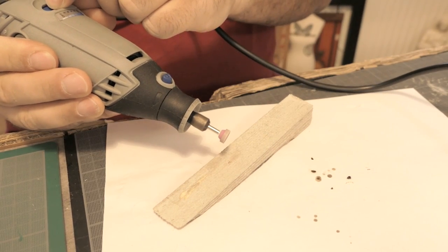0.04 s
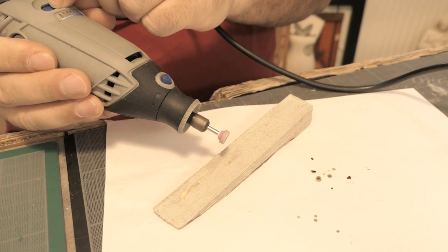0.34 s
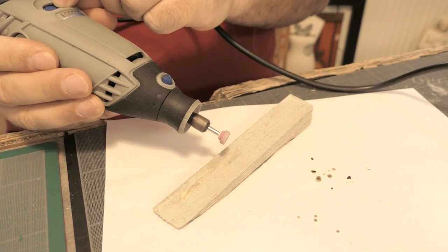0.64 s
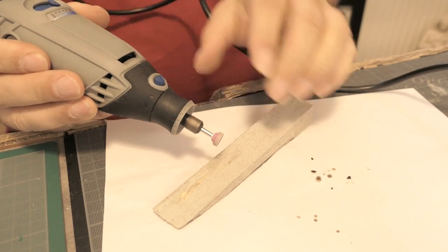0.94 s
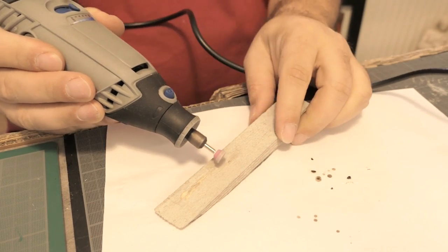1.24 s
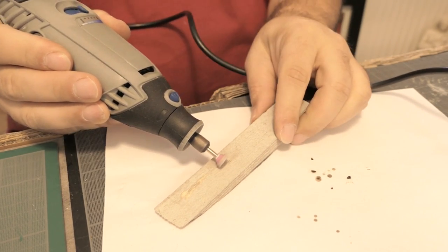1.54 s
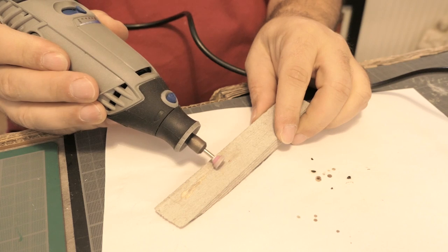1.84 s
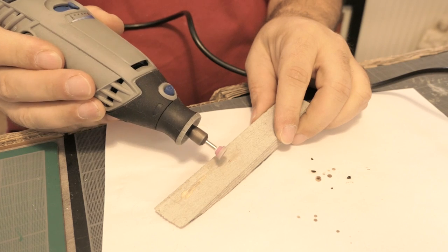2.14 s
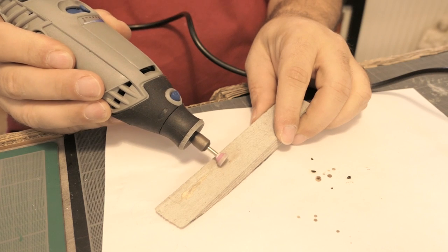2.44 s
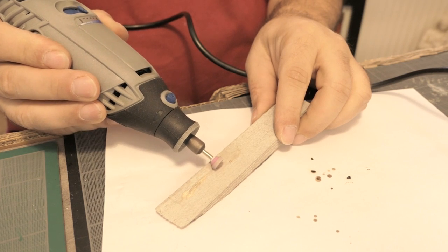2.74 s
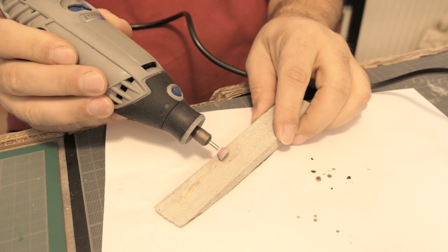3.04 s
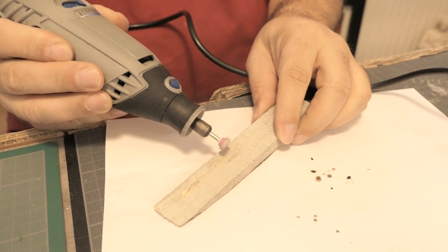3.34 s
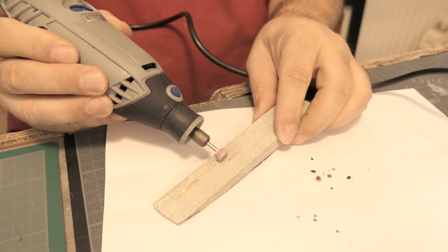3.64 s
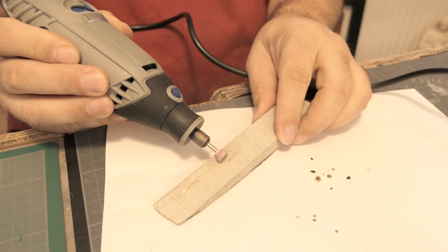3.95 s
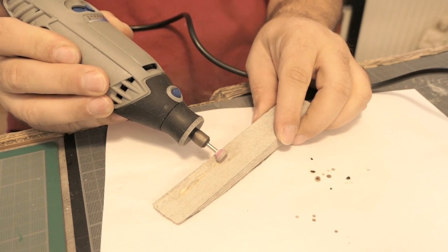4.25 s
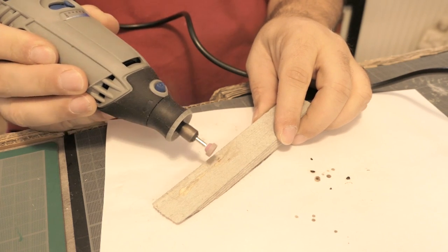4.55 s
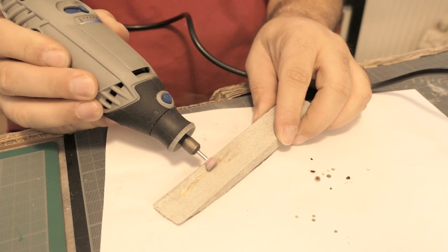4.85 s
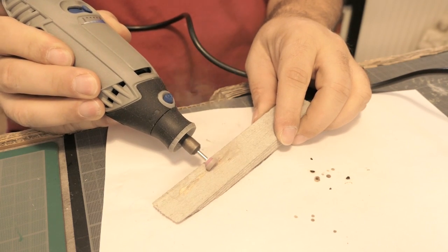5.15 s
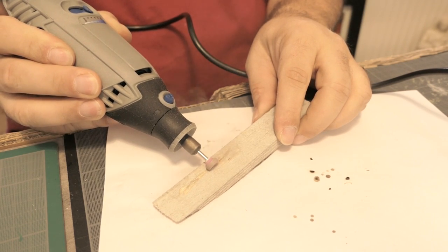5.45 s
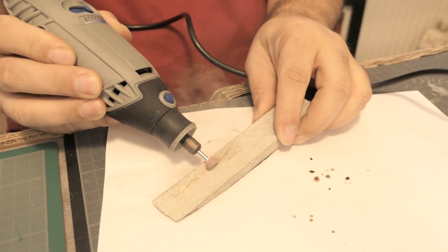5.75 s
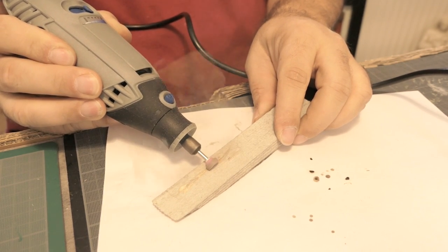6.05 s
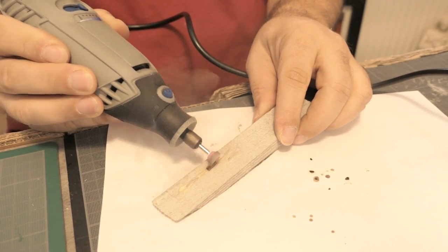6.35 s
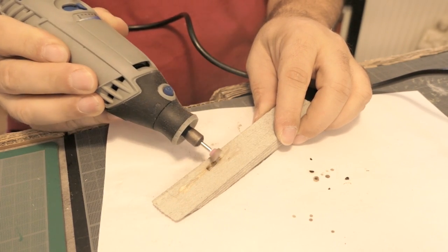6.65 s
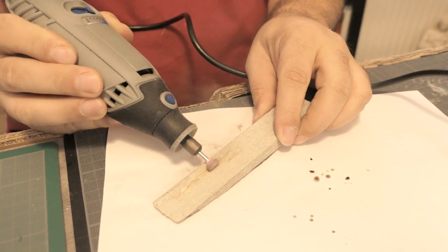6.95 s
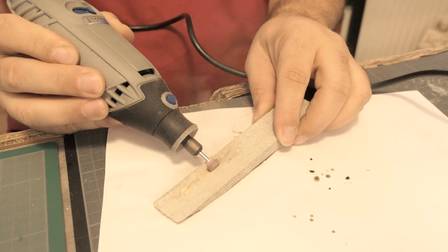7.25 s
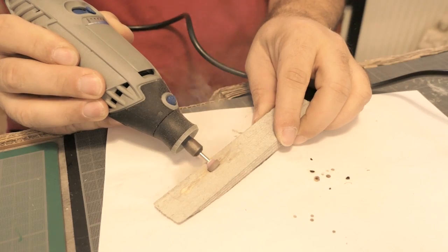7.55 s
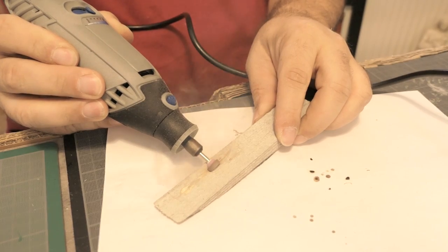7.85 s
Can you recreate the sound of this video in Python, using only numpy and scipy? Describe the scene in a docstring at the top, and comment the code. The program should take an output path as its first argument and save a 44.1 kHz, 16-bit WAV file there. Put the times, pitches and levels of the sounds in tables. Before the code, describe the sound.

Close to the microphone in a small workshop, an electric rotary tool speeds up with a buzzy whine and airy hiss. After a moment its stone scrapes lightly on wood, then digs in harder over six passes, rasping and droning as the motor slows and climbing in pitch whenever it lifts. Tiny chatters and squeaks mark the catches. The last two passes are the deepest, a strained growl that continues to the end.

```python
"""A small motor whines up to speed, then growls and rasps six times as its grinding stone bites into wood.
It is a handheld rotary tool, heard close up. Its cooling fan whistles over rushing air.
Pressing slows the motor, which draws more current and buzzes in time with the mains electricity.
The stone's high spots hit the wooden strip once a turn: a thump, a woody drone and a bright rasp."""
import sys
import numpy as np
from scipy import signal
from scipy.fft import rfft, irfft, next_fast_len
from scipy.io import wavfile
from scipy.ndimage import map_coordinates

SR = 44100
rng = np.random.default_rng(int(sys.argv[2]) if len(sys.argv) > 2 else 0)


def waveform_to_disk(signal):
    """Save audio, clipped to [-1, 1], as 16-bit WAV at the path in sys.argv[1]."""
    frames = np.transpose(np.atleast_2d(signal))
    scaled = np.clip(frames, -1, 1) * 32767
    samples = np.round(scaled).astype(np.int16)
    wavfile.write(sys.argv[1], SR, samples)


N = 357641
TIME = np.arange(N) / SR
FREE_HZ, FULL_DRAG_HZ = 425, 180  # turns a second: running freely, and lost to a firm press
MAINS_HZ, FAN_BLADES, BARS = 50, 18, 8  # bars are the motor's spinning contacts

# How the stone and its stem ring. Each row: pitch in Hz, level in dB.
STONE_RING = [(2000, -54), (3600, -18), (4200, -4.5), (4600, 0), (4820, 5.5), (5050, 8.5), (5300, 9),
              (5500, 4.5), (5700, 8), (6100, -3), (6400, 5), (6800, -11), (8200, -4.5), (9300, -13.5),
              (11500, -36), (13200, -29), (15000, -28)]


def undb(db):
    """Turn decibels into a gain."""
    return 10 ** (np.asarray(db) / 20)


def unit(x):
    """Scale a sound to an average (rms) level of 1."""
    return x / np.sqrt(np.mean(x ** 2))


def curves(table):
    """Join rows that start with a time into one curve per remaining column."""
    times, *columns = np.transpose(table)
    return [np.interp(TIME, times, column) for column in columns]


def along(points, hz):
    """Look up the level in dB at a moving pitch."""
    return np.interp(hz, *np.transpose(points))


def bump(middle_s, half_s):
    """A smooth rise to 1 and back."""
    return np.exp(-((TIME - middle_s) / half_s) ** 2)


def walk(rate):
    """A random wobble of size near 1, changing about rate times a second."""
    steps = rng.standard_normal(N // 10)
    return 1.1 * map_coordinates(steps, [TIME * rate], order=2, mode="wrap")


def colour(x, points):
    """Pass x through a ringing body, given as rows of pitch in Hz and level in dB."""
    hz, db = np.transpose(points)
    size = 4096
    grid = np.maximum(np.arange(size // 2 + 1) * SR / size, 1)
    cepstrum = irfft(np.log(undb(np.interp(np.log(grid), np.log(hz), db))))
    cepstrum[1:size // 2] *= 2  # folded so the body rings only after a hit
    cepstrum[size // 2 + 1:] = 0
    return signal.fftconvolve(x, irfft(np.exp(rfft(cepstrum))))[:N]


def bend(x, delay_s):
    """In bending wood, low notes travel slower than high ones; 1 kHz arrives delay_s late."""
    size = next_fast_len(N + SR // 4)
    hz = np.arange(size // 2 + 1) * SR / size
    return irfft(rfft(x, size) * np.exp(-4j * np.pi * delay_s * np.sqrt(1000 * hz)), size)[:N]


def strikes(turn, angle, scatter_db=1.5, slip=0.002):
    """One click a turn, uneven in size and timing; angle and slip are shares of a turn."""
    turns = np.arange(1, int(turn[-1]) - 1)
    size, shift = rng.standard_normal((N // 50, 2))[:len(turns)].T
    at = np.interp(turns + angle + slip * shift, turn, np.arange(N))
    taps = at.astype(int)[:, None] + np.arange(-3, 5)
    offset = taps - at[:, None]
    clicks = undb(scatter_db * size)[:, None] * np.sinc(offset) * np.sinc(offset / 4)
    return np.bincount(np.clip(taps, 0, N - 1).ravel(), clicks.ravel(), N)


def tone(turn, multiple, waver_db):
    """A wavering tone at a multiple of the shaft's speed."""
    return np.sqrt(2) * np.sin(2 * np.pi * multiple * turn) * undb(waver_db * walk(35))


def mains(depth):
    """Power arrives in two humps per mains cycle, averaging 1."""
    hump = 8 / 3 * np.sin(2 * np.pi * MAINS_HZ * TIME) ** 4
    return 1 + np.clip(depth, 0, 1) * (hump - 1)


def bar_tone(turn, multiple, depth, swing, jitter, waver_db):
    """A motor tone: each hump of current makes it louder and shifts its wave by swing radians."""
    lag = swing * np.cos(4 * np.pi * MAINS_HZ * TIME) + jitter * walk(200)
    return unit(mains(depth)) * tone(turn + lag / (2 * np.pi * multiple), multiple, waver_db)


def workshop(x, fade_s=0.61, echo_db=-15):
    """Add a short, thin echo from the bench and walls."""
    tail = rng.standard_normal(N) * undb(-60 * TIME / fade_s) * (TIME > .003)
    tail = signal.sosfilt(signal.butter(2, 800, "high", fs=SR, output="sos"), tail[:SR // 2])
    return x + undb(echo_db) * signal.fftconvolve(x, tail / np.linalg.norm(tail))[:N]


def fan(turn, hz, drag, air_db):
    """Air rushes through the case and hisses at the vents, where the blades whistle past."""
    # The tone of the air in the case and at the vents, and the whistle's level as its pitch moves.
    # Each row: pitch in Hz, level in dB.
    case_air = [(30, -54), (130, -25), (260, -19.5), (470, -6), (620, -12.5), (800, -3.5), (1150, 3),
                (1600, 0.5), (2100, 2), (2900, -1.5), (4200, -3), (6000, -29), (10000, -19)]
    vent_air = [(100, -52), (1500, -31), (4000, -18), (5200, -8), (6100, -10.5), (6900, -1.5), (7600, -3),
                (8300, -4.5), (9200, -6), (10000, -14.5), (11000, -17.5), (12100, -25), (13400, -22),
                (15500, -34)]
    whistle_levels = [(4300, -51), (4650, -38.5), (4900, -45), (5200, -42), (5400, -41), (5700, -50),
                      (6050, -39), (6500, -36), (6900, -31.5), (7300, -26.5), (7650, -24.5)]
    rush = unit(colour(rng.standard_normal(N) * mains(depth=0.051), case_air))
    rush *= undb(-39 + 0.99 * air_db + 1.13 * walk(30))
    hiss = unit(colour(rng.standard_normal(N) * mains(depth=0.014), vent_air))
    hiss *= undb(-33 + 0.63 * air_db + 1.13 * walk(25))
    whistle_db = along(whistle_levels, FAN_BLADES * hz) + 0.5 * np.maximum(air_db, 0) + 0.77 * walk(13)
    whistle_db += 0.5 - 5.2 * np.minimum(drag / 40, 1)  # softer while pressing
    whistle = tone(turn + 0.0015 * walk(120), FAN_BLADES, waver_db=0.8) * undb(whistle_db)
    overtone = tone(turn, 2 * FAN_BLADES, waver_db=1.0) * undb(whistle_db - 42)
    return rush + hiss + whistle + overtone


def case_rattle(turn, hz, effort, surge):
    """The loose case rattles as the current peaks, and when the buzz meets its own pitch."""
    # How the loose case rings. Each row: pitch in Hz, level in dB.
    loose_case = [(1500, -29), (2150, -12), (2380, -0.5), (2540, 2.5), (2720, -5), (2950, -11), (3500, -28)]
    ring_hz, width_hz = 2520, 420
    in_tune = np.exp(-((BARS * hz - ring_hz) / width_hz) ** 2)
    shaking = bar_tone(turn, BARS, depth=0.62, swing=0.87, jitter=1.35, waver_db=1.5)
    return colour(shaking, loose_case) * (surge * undb(-31) + in_tune * undb(-35 - 18 * effort))


def motor_buzz(turn, hz, effort, surge, bare_db):
    """The spinning bars switch the current: a buzz, with whines at 4 and 6 times its pitch."""
    # How strongly the case gives off each of the three. Each row: pitch in Hz, level in dB.
    buzz_levels = [(1700, -47.5), (1890, -41), (1965, -37), (2050, -29), (2150, -32.5), (2240, -30.5),
                   (2350, -40), (2490, -34.5), (2650, -36.5), (2800, -38.5), (3000, -45.5), (3400, -61.5)]
    whine_levels = [(7700, -44), (8000, -35), (8300, -40), (8600, -42), (9150, -49), (9450, -41),
                    (10000, -50), (11000, -55), (12200, -65), (13700, -61)]
    shrill_levels = [(11500, -40), (12200, -67), (13200, -55), (14300, -57), (15500, -57)]
    whine_db = along(whine_levels, 4 * BARS * hz) + 3.45 * bare_db + 0.5 + 1.8 * walk(12)
    shrill_db = along(shrill_levels, 6 * BARS * hz) + 2 * bare_db
    buzz_db = -4 * (1 - effort) + 10.5 * surge
    buzz = bar_tone(turn, BARS, depth=0.57, swing=0.51, jitter=0.15, waver_db=1)
    whine = bar_tone(turn, 4 * BARS, depth=0.09, swing=0.37, jitter=0.2 + 0.43 * effort, waver_db=2)
    shrill = bar_tone(turn, 6 * BARS, depth=0.4, swing=0.9, jitter=0.5 + 1.3 * effort, waver_db=0)
    return colour(buzz, buzz_levels) * undb(buzz_db) + whine * undb(whine_db) + shrill * undb(shrill_db)


def brushes(turn, load, effort, bare_db):
    """Fixed contacts rub the bars, humming, scratching and sparking more as the shaft slows."""
    # Overtones of the buzz. Each row: multiple of shaft speed, level in dB, mains pulsing from 0 to 1.
    overtones = [(16, -44, 0.33), (24, -52, 0)]
    # How the motor's case rings. Each row: pitch in Hz, level in dB.
    case_ring = [(1000, -17.5), (2100, -6), (2900, -19), (3300, -22), (3900, -7.5), (4250, -1), (4550, -2),
                 (5000, 1), (5800, 1.5), (6500, 0.5), (7150, -8.5), (8100, 1.5), (9500, -1), (11500, -28),
                 (14000, -20)]
    hum = sum(undb(db) * bar_tone(turn, multiple, depth, swing=0.38, jitter=0.45, waver_db=3)
              for multiple, db, depth in overtones)
    hum *= undb(3.8 * bare_db + 2 * load)
    # Unevenly worn bars scratch out the same pattern on every turn.
    wear = unit(irfft(np.r_[0, np.exp(2j * np.pi * rng.random(48))], 2048))
    scratch = np.interp(turn % 1, np.linspace(0, 1, len(wear)), wear)
    scratch *= mains(depth=0.067) * undb(-40.5 + 16.4 * load)
    sparks = colour(rng.standard_normal(N) * mains(depth=0.3),
                    [(9000, -27), (12200, -10), (13200, 6), (14100, -10), (15500, -9)])
    return colour(hum + scratch, case_ring) + unit(sparks) * undb(-72 + 36 * load + 7 * effort)


def motor(turn, hz, load, drag, air_db):
    """The whole motor, with the low hum of its slightly unbalanced shaft."""
    effort = drag / FULL_DRAG_HZ
    bare_db = np.maximum(air_db - 4, 0)  # the case rings out when the hand is clear of it
    surge = bump(middle_s=0.35, half_s=0.16)  # the current peaks during spin-up
    rattle = case_rattle(turn, hz, effort, surge)
    buzz = motor_buzz(turn, hz, effort, surge, bare_db)
    rubbing = brushes(turn, load, effort, bare_db)
    unbalance = tone(turn, 0.98, waver_db=2) * undb(-50 + 1.93 * air_db - 28 * load)
    return rattle + buzz + rubbing + unbalance


def wood_thump(turn, hz, load, gain):
    """The off-centre stone shoves the strip once a turn, and the bench rumbles under it."""
    # The thump's strength at each shaft speed, and the bench's tone. Each row: pitch in Hz, level in dB.
    thump_levels = [(244, -19.5), (260, -23), (280, -23.5), (300, -24.5), (325, -25), (345, -21.5),
                    (375, -27), (400, -28), (422, -31)]
    bench = [(30, -11), (70, -13), (150, -5), (250, 5), (450, -1), (900, -57)]
    thump = tone(turn, 1, waver_db=0.95) * mains(depth=0.015)
    rumble = unit(colour(rng.standard_normal(N), bench)) * undb(-52 + 63 * load)
    return (thump + rumble) * gain * undb(along(thump_levels, hz))


def wood_drone(turn, high_spot, gain):
    """The stone's high spots knock the wood so fast that the knocks blur into a drone."""
    # How the strip and bench ring. Each row: pitch in Hz, level in dB.
    wood = [(120, -55), (250, -28), (400, -0.5), (490, 7.5), (560, 2), (630, -2.5), (690, 14.5), (740, -6),
            (795, 2.5), (840, 4.5), (1000, 6), (1180, -9), (1290, 3.5), (1400, -5), (1640, 4.5), (1750, -5),
            (2040, 0.5), (2450, 2), (2570, -4), (3200, -9), (5000, -28.5)]
    far_side = 0.26 * strikes(turn, 0.489, slip=0.003)
    # Smaller spots come and go as the groove changes shape.
    small_spots = sum(walk(11) * strikes(turn, angle) for angle in rng.random(4))
    knocks = unit(high_spot + far_side + 0.31 * small_spots)
    return unit(bend(colour(knocks, wood), delay_s=0.003)) * gain * undb(-32 + 1.1 * walk(15))


def stone_rasp(turn, high_spot, gain):
    """The stone rings as it scrapes; deep in the last groove it tears out fibres."""
    # The tone of tearing fibres. Each row: pitch in Hz, level in dB.
    fibre_tone = [(2000, -45), (3700, -20), (4500, 1), (5200, 9), (5750, -1), (6500, -9), (8200, -10),
                  (10000, -22), (13200, -20), (15000, -26)]
    tear_start_s, tear_rise_s = 7.6, 0.1
    tearing = np.clip((TIME - tear_start_s) / tear_rise_s, 0, 1)
    grit = unit(rng.standard_normal(N) * np.exp(-(turn % 1) / 0.76))  # fades after each blow
    grains = sum(walk(50) * strikes(turn, angle) for angle in rng.random(6))  # they grip and let go
    scrape = unit(high_spot + 0.1 * grains) * undb(-8 * tearing) + grit * undb(-14)
    rasp = unit(colour(scrape, STONE_RING)) * gain * undb(2.5 + 1.2 * walk(60))
    fibres = unit(colour(grit, fibre_tone)) * tearing * undb(-36.5)
    return rasp + fibres


def squeals(turn):
    """In a tight groove the stone's ring locks onto a multiple of the shaft's speed."""
    # Each row: middle and half-length in seconds, multiple of shaft speed, level in dB.
    squeal_times = [(4.05, 0.15, 14, -33.5), (5.53, .07, 20, -41), (5.57, 0.074, 16, -45),
                    (5.602, 0.089, 18, -34.5), (7.328, 0.048, 18, -32)]
    return sum(bump(middle, half) * undb(db) * tone(turn + 0.002 * walk(120), multiple, waver_db=3.5)
               for middle, half, multiple, db in squeal_times)


def catches(turn):
    """On touching or leaving the wood, the stone bounces for a few turns and jolts the strip."""
    # Each row: middle and half-length in seconds, chatter in dB, thud in dB, roughness from 0 to 1.
    jolts = [(1.397, 0.014, -34, -51, 0.3), (2.954, 0.0073, -30, -38, 0.77),
             (4.384, 0.017, -28.5, -44, 0.5), (4.751, 0.016, -28, -36, 0.9),
             (6.288, 0.02, -26.5, -46, 0.23), (6.828, 0.0085, -35, -43, 0.69),
             (6.905, 0.011, -23.5, -38, 0.75)]
    bounces = unit(colour(strikes(turn, 0, slip=0.0062), STONE_RING))
    scuff = unit(colour(rng.standard_normal(N), STONE_RING))
    thud = unit(colour(rng.standard_normal(N), [(60, -25), (200, -21), (400, 15), (560, -4),
                                                (690, 2.5), (900, -2), (1500, 6), (5000, -41)]))
    sound = np.zeros(N)
    for middle, half, chatter_db, thud_db, rough in jolts:
        chatter = unit((1 - rough) * bounces + rough * scuff)
        sound += bump(middle, half) * (undb(chatter_db) * chatter + undb(thud_db) * thud)
    return sound


def grinding(turn, hz, load, thump_gain, drone_gain, rasp_gain):
    """The stone shoves, knocks and rasps the wood, now and then skidding or biting on the grain."""
    # Skids and bites. Each row: middle and half-length in seconds, dB change of thump, drone and rasp.
    slips = [(1.433, 0.035, -8, -6.5, 8.5), (1.62, 0.072, 1, -2, 8), (2.464, 0.065, -1, 2.5, 6),
             (2.763, 0.057, -7, 7, 2.5), (3.08, 0.069, 4, 3.5, 7), (3.661, 0.045, 2, 0.5, 4),
             (3.878, 0.066, 3.5, -1, 5), (4.88, 0.026, 0, -1.5, -11), (4.956, 0.034, 5, 0.5, -2),
             (5.018, 0.029, -2, 1.5, -3), (5.054, 0.01, -6, -3, -2), (5.46, 0.091, -3.5, 5.5, 2.5),
             (5.616, 0.065, 1, 1.5, -8), (5.698, 0.03, -7, 4, 2), (6.306, 0.013, -1, 9, 0),
             (6.92, 0.043, -3, -6, 3), (7.195, 0.041, -13, -1, -1), (7.243, 0.026, 5.5, -11, 1.5),
             (7.325, 0.023, -4, 6, 3.5), (7.401, 0.015, -6, 3, -6), (7.603, 0.097, 2, -1.5, 0),
             (7.979, 0.24, 0.8, 4, 2)]
    thump_db, drone_db, rasp_db = sum(np.outer(changes_db, bump(middle, half))
                                      for middle, half, *changes_db in slips)
    high_spot = strikes(turn, 0, scatter_db=0, slip=0.0018)
    drone = wood_drone(turn, high_spot, drone_gain * undb(drone_db))
    rasp = stone_rasp(turn, high_spot, rasp_gain * undb(rasp_db))
    return drone + rasp + wood_thump(turn, hz, load, thump_gain * undb(thump_db))


def pressing():
    """The hand presses the stone in: more drag on the shaft means a louder thump and drone."""
    # The six presses. Each row: thump in dB, drone in dB, a list of steps.
    # Each step: time in seconds, drag in turns a second lost, rasp in dB.
    presses = [(-6.5, 1.5, [(1.385, 3.5, -49), (1.545, 12.3, -39.5), (1.825, 9.8, -42.5),
               (2.05, 19.6, -43)]), (1, 0.5, [(2.335, 5.5, -34), (2.475, 30.7, -36), (2.685, 52.6, -34),
               (2.85, 13.3, -30.5)]), (-0.5, 1.5, [(2.935, 24.7, -39), (3.0, 3.3, -41), (3.179, 44, -35),
               (3.32, 38, -33.5)]), (1, 0.5, [(3.475, 2.48, -41), (3.595, 38, -31), (3.744, 94, -39),
               (4.065, 88, -35), (4.341, 113, -35.5), (4.44, 32, -33)]), (-0.5, -1, [(4.735, 2, -34),
               (4.86, 103, -33), (5.006, 171, -35), (5.18, 158, -41), (5.274, 120, -44),
               (5.535, 149.3, -41), (5.686, 196, -37.5), (6.227, 177.5, -43.5), (6.32, 25.3, -46.0)]),
               (-2.5, -1.5, [(6.82, 2.14, -39.5), (6.986, 114, -32), (7.055, 132, -32), (7.314, 197, -34.5),
               (7.469, 220, -49), (7.563, 198, -61), (7.655, 158.5, -39), (8.11, 188, -32)])]
    grip_s, settle_s, lift_s = 0.0066, 0.0038, 0.042
    drag, contact, thump, drone = np.zeros((4, N))
    for thump_db, drone_db, steps in presses:
        start, end = steps[0][0], steps[-1][0]
        braking = np.maximum(curves(steps)[0], 1)
        grip = np.clip((TIME - start) / grip_s + 0.5, 0, 1)
        touch = grip * (1 - np.tanh(2 * (TIME - end) / lift_s + 0.5)) / 2
        settled = 1 - np.exp(-np.maximum(TIME - start, 0) / settle_s)
        drag += braking * (TIME > start) * (TIME < end)
        contact += touch
        thump += touch * (braking / FULL_DRAG_HZ) ** 0.36 * undb(thump_db)
        drone += touch * settled * (braking / FULL_DRAG_HZ) ** 0.28 * undb(drone_db)
    _, rasp_db = curves([step for *_, steps in presses for step in steps])
    return drag, contact, thump, drone, contact * undb(rasp_db)


def shaft_speed(drag, start_hz=240.9, lag_s=0.218):
    """The shaft takes a moment to follow the motor's pull and the wood's drag."""
    # The speed the motor aims for. Each row: time in seconds, turns a second.
    spin_up = [(0, 276), (0.424, 421.2), (1.6, 429.7)]
    drive, = curves(spin_up)
    step = 1 / (lag_s * SR)
    return start_hz + signal.lfilter([step], [1, step - 1], drive - drag - start_hz)


def scene():
    """The hand presses, the shaft slows, and that one shaft drives every source."""
    # The cooling air, which the moving hands partly cover. Each row: time in seconds, level in dB.
    airflow = [(0.0, 7), (0.69, 5), (0.82, 0.1), (1.37, -5), (1.95, 1), (2.2, -3.5), (2.6, -3.5),
               (3.02, 2.5), (3.2, -3.5), (3.45, 0), (4.54, 3), (4.81, -1.5), (5.64, 4.5), (6.05, -0.3),
               (6.6, 4), (7.01, -2), (7.15, 2.5), (8.11, -0.3)]
    drag, contact, *grinding_gains = pressing()
    hz = shaft_speed(drag)
    air_db = curves(airflow)[0] - 1.5 * contact
    load = np.clip(1 - hz / FREE_HZ, 0, 1)  # share of the free speed that is lost
    wobble = (0.0005 + 0.00196 * load) * walk(30)  # a straining shaft runs less evenly
    turn = np.cumsum(hz * (1 + wobble)) / SR  # turns made so far
    tool = fan(turn, hz, drag, air_db) + motor(turn, hz, load, drag, air_db)
    stone = grinding(turn, hz, load, *grinding_gains) + squeals(turn) + catches(turn)
    sound = workshop(tool + stone)
    return np.array([sound, sound])


def record(dry):
    """Thin the deep bass and cut the highest treble."""
    thinned = signal.sosfilt(signal.butter(2, 65, "high", fs=SR, output="sos"), dry)
    return signal.sosfilt(signal.ellip(10, .2, 80, 15650, fs=SR, output="sos"), thinned)


dry = scene()
out = record(dry)
waveform_to_disk(out)
```